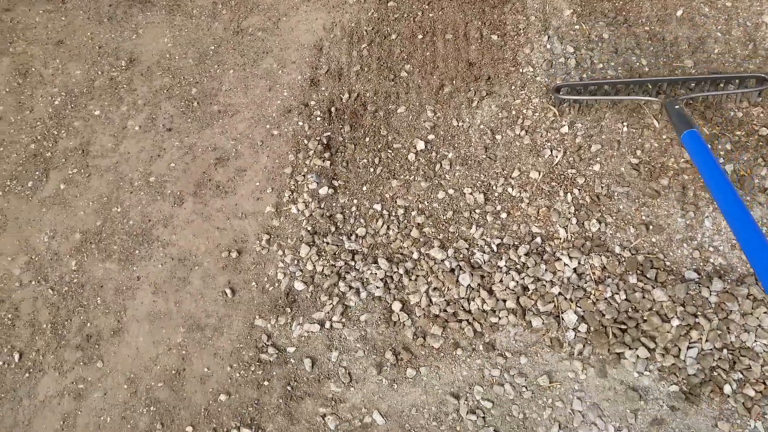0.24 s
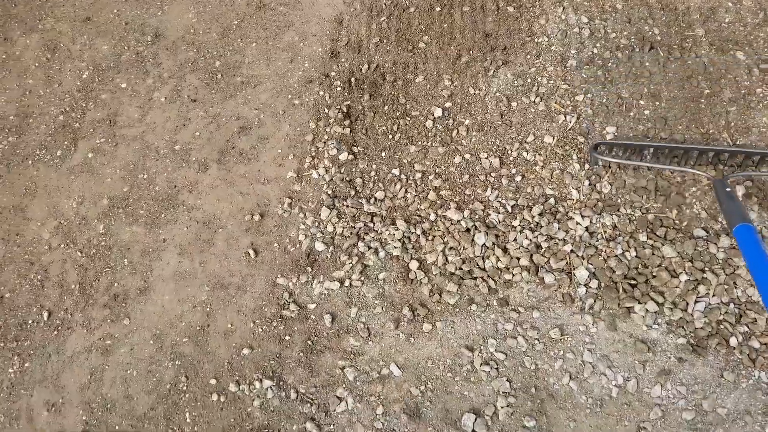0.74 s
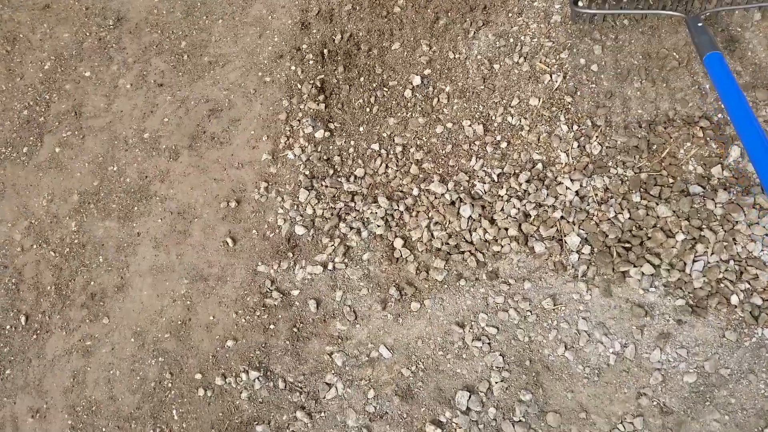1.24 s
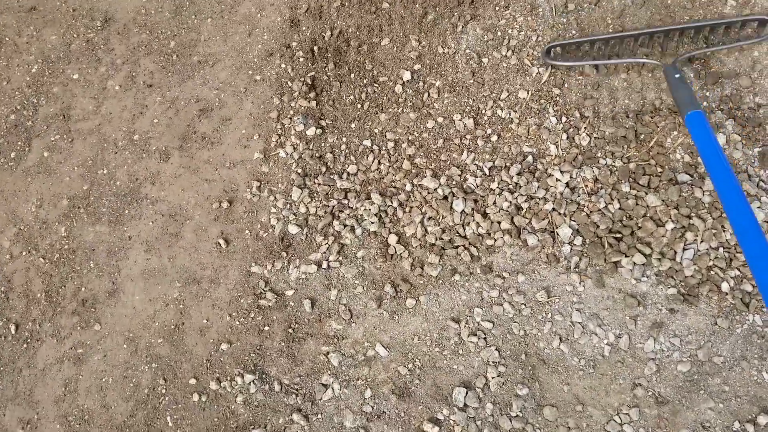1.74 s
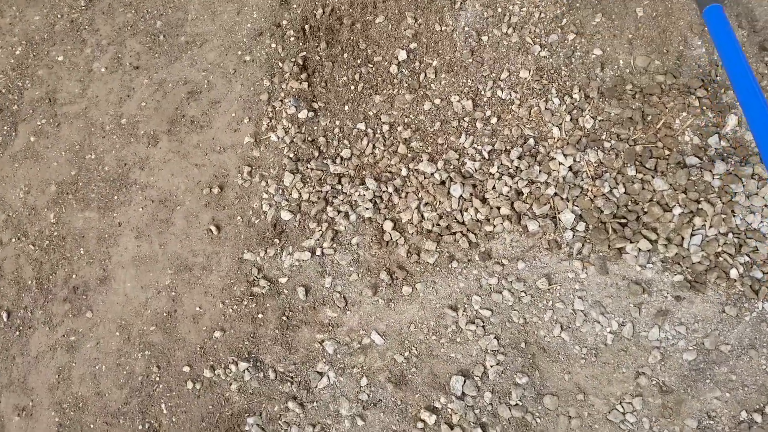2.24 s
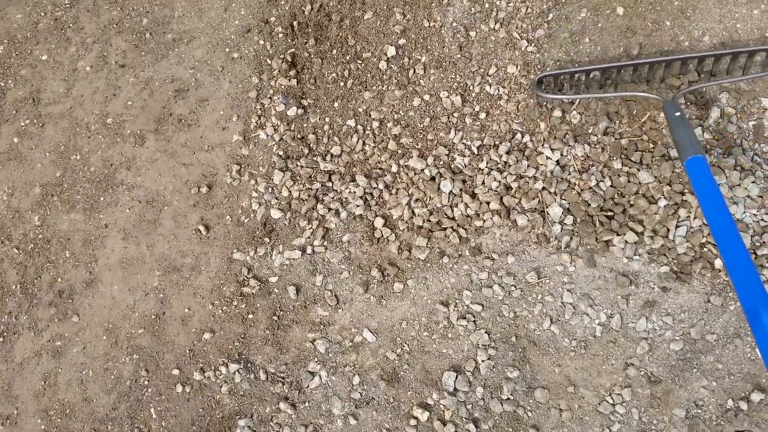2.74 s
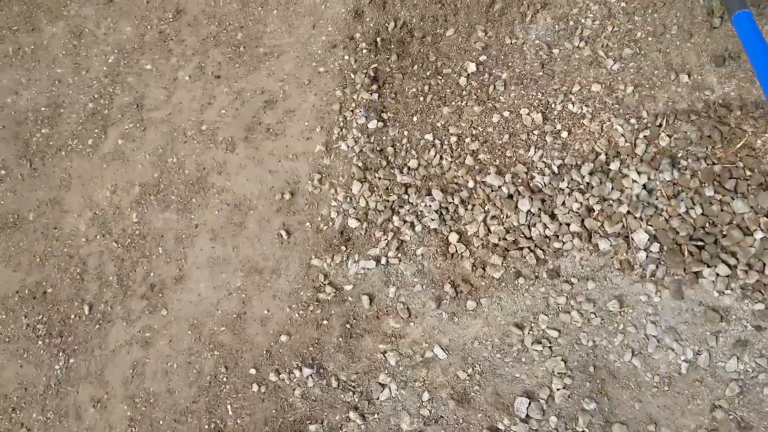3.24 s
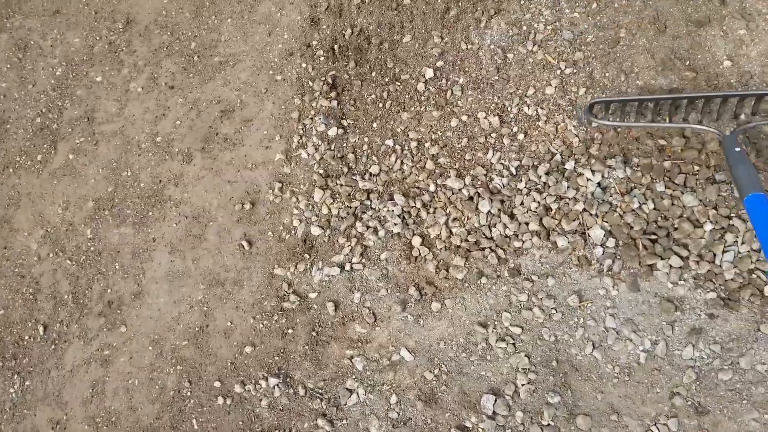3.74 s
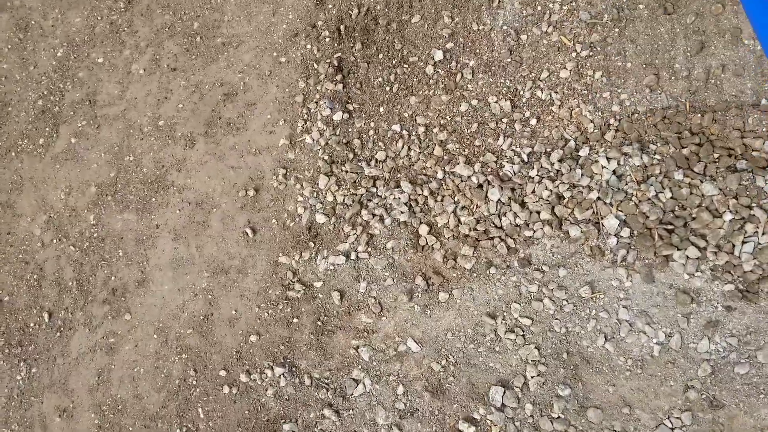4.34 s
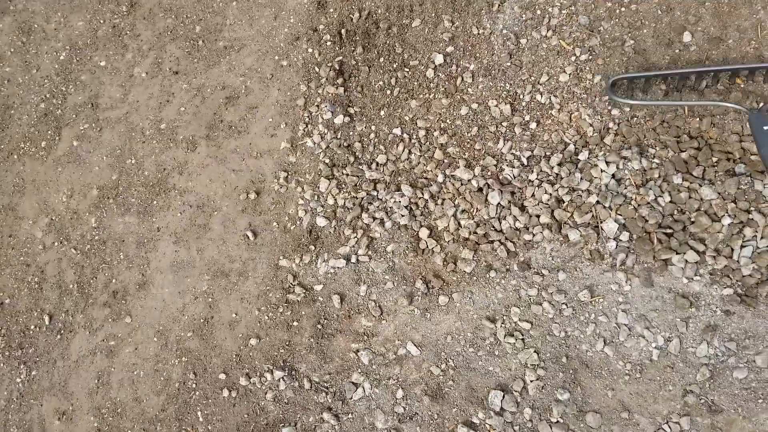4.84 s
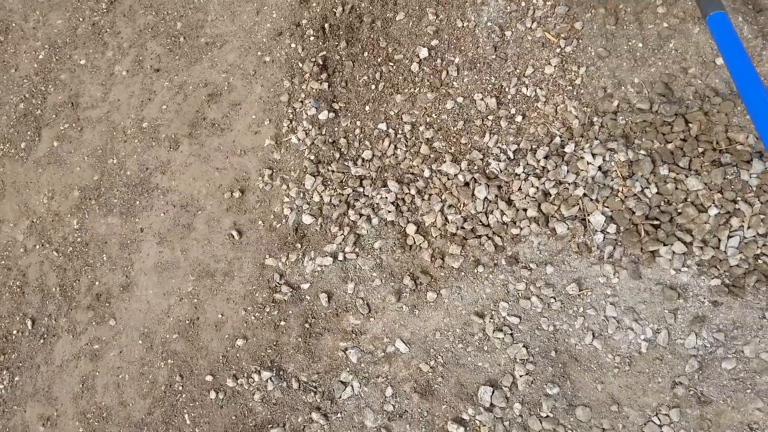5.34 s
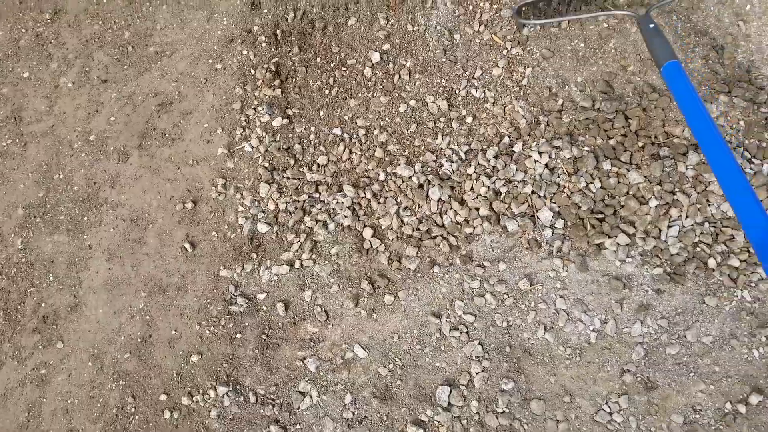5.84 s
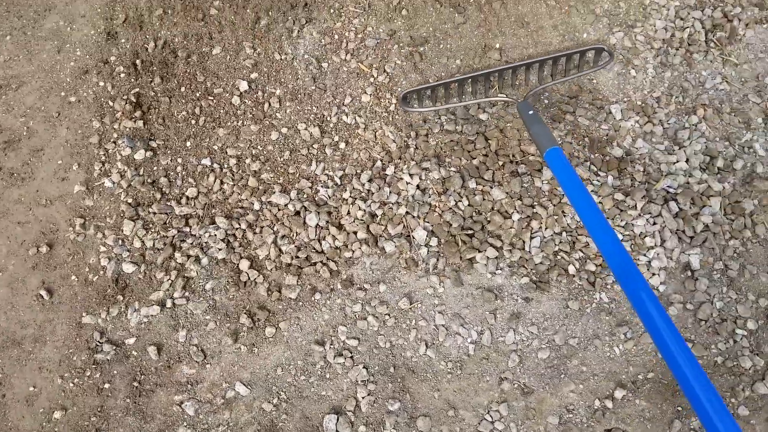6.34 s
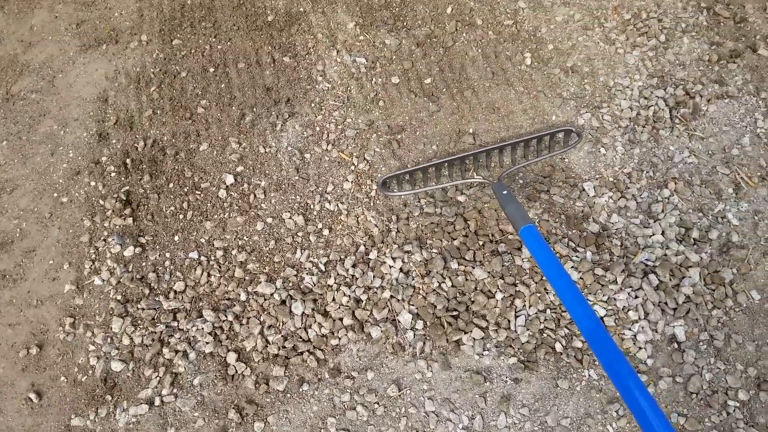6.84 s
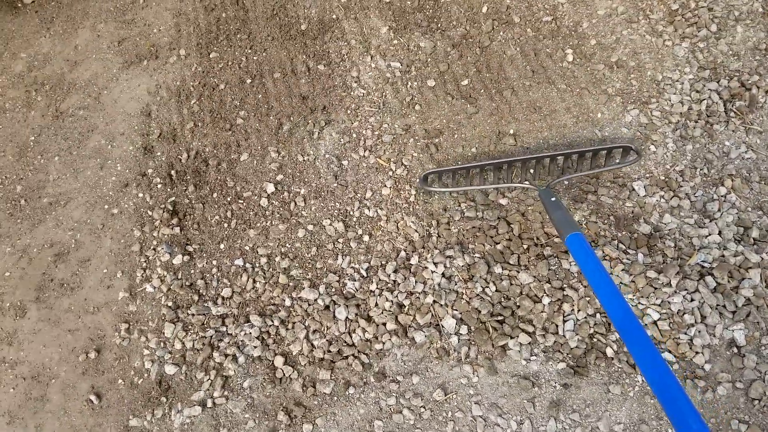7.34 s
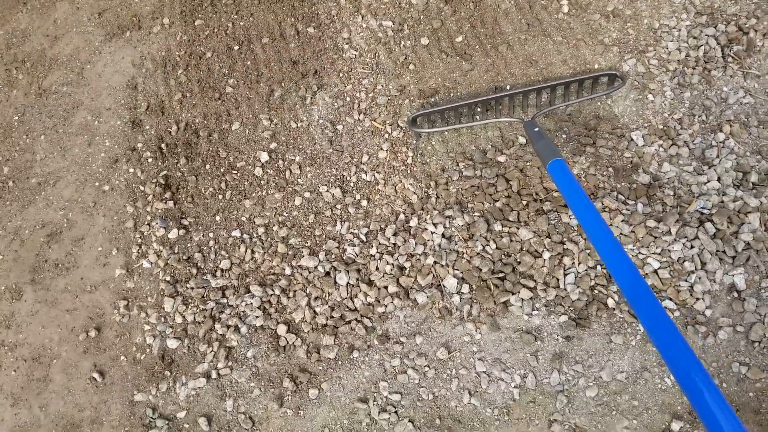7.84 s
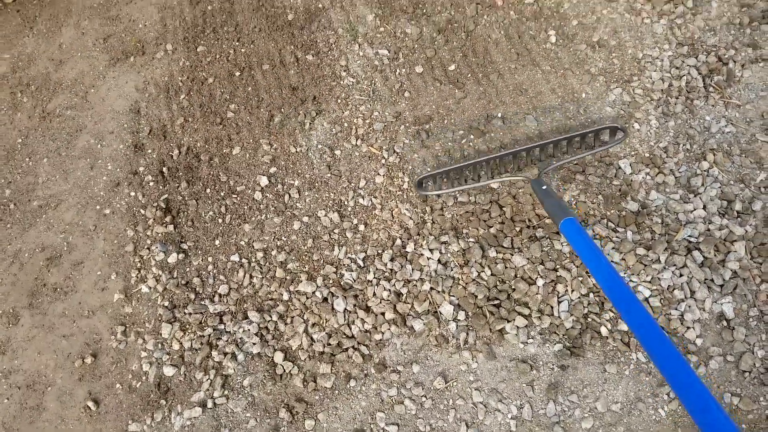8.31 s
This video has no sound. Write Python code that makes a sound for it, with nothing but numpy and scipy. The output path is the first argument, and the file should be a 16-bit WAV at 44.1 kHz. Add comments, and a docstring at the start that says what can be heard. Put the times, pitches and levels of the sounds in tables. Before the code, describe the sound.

Close outdoor raking: gritty scrapes, bright stone clacks against ringing metal tines, a dull handling bump, then quieter strokes with gaps.

```python
"""Raking gravel, close right

A metal rake is dragged back and forth through loose gravel on dirt, to the right of a hand-held camera.
Stones knock the tines and ring modes of the rake head, clack in bursts of noise and hiss as filtered sand.
The strokes thin out; a tine sometimes sings, and decaying low sines are rake thumps on dirt and one jolt tone.
Jolts swing the two microphones nearly against each other; far off lies a lumpy rumble under a thin hiss."""
import sys
import numpy as np
from scipy import signal
from scipy.fft import rfft, irfft, next_fast_len
from scipy.io import wavfile
from scipy.ndimage import uniform_filter1d, map_coordinates

SR = 44100
rng = np.random.default_rng(int(sys.argv[2]) if len(sys.argv) > 2 else 0)


def transcribe(u):
    """Save the signal u as a 16-bit wav file named by the first command-line argument.

    u: samples, shape (n,) or (channels, n), limited to [-1, 1]; the rate is SR.
    q: integer samples, one column per channel.
    """
    v = np.clip(np.atleast_2d(u).T, -1, 1)
    q = np.round(v * 32767).astype(np.int16)
    wavfile.write(sys.argv[1], SR, q)


N = 378245  # samples


def amp(db):
    """Decibels to gain."""
    return 10 ** (np.asarray(db) / 20)


def unit(x):
    """Scaled to rms 1."""
    return x / np.sqrt(np.mean(x ** 2) + 1e-20)


def along(points, hz):
    """Reads (Hz, value) points on a log frequency axis."""
    f, v = np.transpose(points)
    return np.interp(np.log(hz + 1), np.log(f + 1), v)


def curves(rows):
    """One value per sample for each column after the time."""
    s, *cols = np.transpose(rows)
    return [np.interp(np.arange(N) / SR, s, c) for c in cols]


def wobble(rate):
    """A smooth random curve through rate knots a second (below 200)."""
    knots = rng.standard_normal(int(N / SR * 200) + 4)
    return map_coordinates(knots, [np.arange(N) * rate / SR])


def filtered(x, response):
    """x times a complex response of frequency."""
    m = next_fast_len(N + SR // 2)
    return irfft(rfft(x, m) * response(np.fft.rfftfreq(m, 1 / SR)), m)[..., :N]


def mode(x, hz, width_hz):
    """x rings one resonance; an impulse of 1 rings at size 1."""
    r, w = np.exp(-np.pi * width_hz / SR), 2 * np.pi * hz / SR
    return signal.lfilter([0, np.sin(w)], [1, -2 * r * np.cos(w), r * r], x)


def contacts(rate, spread_db):
    """Random impulses, rate a second, mostly small with a few large ones; rms 1."""
    chance, size, sign = rng.random((3, N))
    heights = amp(-spread_db * np.log(size + .02))
    return unit((chance < rate / SR) * heights * np.sign(sign - .5))


def patchy(x, depth_db):
    """Random patches of colour in time and frequency, as stones of other sizes pass."""
    z = signal.stft(x, nperseg=256)[2]
    field = rng.standard_normal(z.shape[-2:])
    field = uniform_filter1d(uniform_filter1d(field, size=3, axis=0), size=6, axis=1)
    return signal.istft(z * amp(depth_db * unit(field)), nperseg=256)[1][..., :N]


# pulls of the rake: (full pressure from [s], until [s], scrape level there [dB], scrape level at the end [dB],
# rise [s], fall [s], tine rattle over the scrape [dB], grit over the scrape [dB])
STROKE_PULLS = [(0.102, 0.18, -35, -31.5, 0.1, .05, -4.5, -8),
                (0.207, 0.377, -31, -30.5, 0.053, 0.11, -0.5, -8),
                (0.413, 0.564, -30, -31.5, 0.047, .1, -3, -8.5),
                (0.795, 0.852, -33.5, -30.5, 0.1, .04, 1.5, -1.5),
                (0.894, 0.957, -37, -38.5, 0.028, .04, 1, -5), (1.007, 1.3, -28, -33.5, 0.033, .1, 2, -5),
                (1.461, 1.52, -34, -39, .07, .04, 1, -3.5), (1.61, 1.76, -21, -28, 0.079, .1, -3.5, -7),
                (1.888, 2.083, -23.5, -22, .05, 0.081, -4.5, -5),
                (2.15, 2.198, -36.5, -29, 0.13, 0.046, -2.5, -2.5),
                (2.345, 2.64, -27.5, -37, 0.075, .07, -1, -5),
                (2.727, 2.79, -30, -34, 0.055, .04, -4.5, -8.5),
                (2.82, 2.864, -25, -20.5, 0.055, 0.058, -1.5, -6.5),
                (2.92, 3.06, -29, -35, .03, .1, -2.5, -8), (3.319, 3.55, -28, -28.5, 0.091, .05, -2, -9),
                (3.687, 3.77, -34.5, -34, 0.077, 0.057, -1, -1),
                (3.815, 3.984, -27.5, -32.5, 0.037, .08, 1.5, -5),
                (4.116, 4.27, -29, -31.5, 0.041, .09, 1.5, -7),
                (4.444, 4.618, -34.5, -37, 0.11, 0.084, 3.5, -4.5),
                (4.64, 4.8, -29, -24.5, .04, 0.072, 0, -7),
                (5.029, 5.254, -27, -27.5, 0.14, 0.032, -0.5, -4),
                (5.27, 5.369, -34.5, -33, .04, 0.13, 1, -3),
                (5.62, 5.693, -32.5, -30.5, .05, 0.065, -4, -9.5),
                (5.73, 5.98, -29, -33.5, .04, .07, -5, -12),
                (6.1, 6.233, -31.5, -35.5, 0.06, 0.025, 0, -4.5),
                (7.13, 7.25, -51, -49.5, 0.13, .08, -4, 0.5),
                (7.344, 7.462, -34.5, -34, 0.048, 0.037, -1.5, -3),
                (7.516, 7.56, -41, -41.5, 0.029, .05, -10, -3.5),
                (7.694, 7.8, -59, -53.5, 0.065, .06, -4, 4.5), (8.062, 8.15, -50.5, -59, 0.14, .06, 2, 7),
                (8.24, 8.31, -25, -33, 0.047, .04, -9, -11.5),
                (8.364, 8.46, -21.5, -32.5, 0.023, .05, -0.5, -3),
                (8.552, 8.58, -44, -47, 0.062, .05, 9.5, -14)]
EDGE_DB = 20  # what a stroke gains in its rise time and loses in its fall time
REST_DB = -68.5  # sand trickling while the rake lies still
SURGE_DB, SURGE_RISE_S, SURGE_FALL_S = -22.5, 0.0031, 0.022  # gravel shoved along, relative to a loud stone


def strokes():
    """Gains of scrape, rattle and grit: each stroke rises, holds and falls; loud stones shove gravel along."""
    t = np.arange(N) / SR
    scrape = np.full(N, amp(REST_DB))
    rattle, grit = scrape.copy(), scrape.copy()
    for start, end, first_db, last_db, rise, fall, rattle_db, grit_db in STROKE_PULLS:
        outside = np.maximum(start - t, 0) / rise + np.maximum(t - end, 0) / fall
        press = amp(np.interp(t, [start, end], [first_db, last_db]) - EDGE_DB * outside)
        scrape = scrape + press
        rattle = rattle + press * amp(rattle_db)
        grit = grit + press * amp(grit_db)
    surge = np.zeros(N)
    for s, db, *_ in LOUD_STONES:
        surge += amp(db + SURGE_DB) * np.exp(np.minimum((t - s) / SURGE_RISE_S, (s - t) / SURGE_FALL_S))
    # rattle and grit are returned relative to the scrape
    return scrape + surge, rattle / scrape, grit / scrape


# loudest stones against the tines, also played by stones() and strokes():
# (time [s], level [dB], struck pitch [Hz], head knock [dB], tine ring [dB])
LOUD_STONES = [(0.0989, -21.5, 2520, -6, -2), (0.2181, -15.5, 2310, -1.5, -4),
               (0.2635, -11.5, 5300, -11, -14), (0.2964, -11.5, 2300, -3.5, -24),
               (0.4193, -23, 2030, 3, 0.5), (0.707, -24, 5200, -19, -20), (0.7588, -25, 4480, -24, -25),
               (0.7765, -12, 4060, -21, -26), (0.8926, -10, 4260, -14, -10.5),
               (0.9304, -7.5, 3250, -23, -34), (0.989, -22, 4100, -11, -2), (1.026, -12, 3300, -27, -9),
               (1.044, -19, 3380, -29, 5), (1.0615, -12, 3340, -24, -16), (1.1282, -10.5, 5230, -9, 3),
               (1.212, -9, 2160, -6.5, -10), (1.4986, -15, 6220, -2.5, -7),
               (1.5793, -11.5, 5300, -15, -12.5), (1.6253, -8, 5630, -3.5, -15),
               (1.6424, -7.5, 5230, -41, -4.5), (1.6778, -6.5, 5800, -7, -5.5),
               (1.7042, -16.5, 3870, -19, -6), (1.8977, -17.5, 4870, 4, 0), (1.949, -25, 4260, -25, -6),
               (2.0525, -13, 5580, -1.5, -19), (2.1728, -28, 4300, -14, 3), (2.3816, -15.5, 4320, -3, 0),
               (2.4383, -20, 4160, -2, -5), (2.4789, -7, 3180, -9, -23), (2.4876, -2.5, 3377, -27, -6),
               (2.5155, -15.5, 3300, -23, 0), (2.5436, -7, 3600, -15.5, -16),
               (2.5545, -13.5, 4240, -15, -4), (2.592, -8.5, 2510, -15, -17), (2.6204, -7, 5100, -33, -22),
               (2.815, -12.5, 4530, -9, -5), (2.9279, -10.5, 4300, -7, -13),
               (3.0139, -20.5, 6140, -14, -1.5), (3.2276, -25.5, 5140, -11, -14),
               (3.3513, -21, 4240, -22, 2), (3.435, -11, 2780, -21, -15), (3.4529, -6, 5040, -23.5, -38),
               (3.4675, -5, 3670, -15, -6), (3.5508, -14.5, 3620, -47, -13),
               (3.6847, -17.5, 2760, -3.5, -19), (3.7475, -18.5, 3180, -8, -11.5),
               (3.8602, -6.5, 3260, -9, -15.5), (3.928, -6.5, 2970, -31, -14), (4.0934, -15, 2260, -6, -16),
               (4.139, -5.5, 3248, -17, -6.5), (4.1873, -9.5, 5226, -34.5, -3.5),
               (4.2241, -18.5, 2900, -6, -2), (4.4255, -24.5, 5430, -9, 1.5),
               (4.4562, -19.5, 2330, -12, -6), (4.5393, -16, 2760, -9.5, -16), (4.6014, -17, 5820, -46, -5),
               (4.6418, -17, 3310, -4.5, -13), (4.6661, -17.5, 3160, -4, -2), (4.695, -2.5, 5000, -34, -19),
               (4.7556, -10, 2280, -10, -11), (4.7943, -4.5, 2140, -21, -22),
               (5.0417, -12, 5550, -19.5, -19), (5.083, -9.5, 3870, -19, -13), (5.1684, -14, 2730, -7, -6),
               (5.2628, -8.5, 4230, -8, -4.5), (5.3333, -18.5, 3280, -5, 5),
               (5.618, -16.5, 3310, -11.5, -26.5), (5.7356, -18, 2250, 0, -6),
               (5.7641, -15, 2190, -2.5, -4), (5.7804, -4.5, 3170, -31.5, -23), (5.8107, -18, 3800, -2, -6),
               (5.9345, -19.5, 4880, -10, -13), (6.0966, -23.5, 3210, -8.5, -7),
               (6.2188, -32.5, 3980, -14, -4.5), (6.5735, -37.5, 2100, -29, -22),
               (6.5944, -43.5, 2210, -19, -13), (6.6665, -46, 6160, -22, -12),
               (6.7426, -33.5, 6400, -31, -21), (7.012, -46.5, 6510, -24, -0.5),
               (7.129, -47, 5430, -22, -14), (7.177, -39, 1950, -10, -18), (7.3108, -38, 1960, -26, -16),
               (7.3392, -31, 4940, -22, 1), (7.3821, -12, 1940, -8, -18), (7.428, -15.5, 2050, -18, -17.5),
               (7.5186, -22.5, 2630, -29, -24), (7.636, -24.5, 6350, -32, -21),
               (7.7134, -31.5, 2160, -12, -17), (7.7707, -32, 4800, -10, -16),
               (7.8856, -26, 4870, -32, -22), (7.937, -32, 4210, -40, -10),
               (8.0523, -29.5, 4300, -14.5, -14), (8.2147, -24.5, 2190, -10, 0),
               (8.2495, -28.5, 2620, 5.5, 1), (8.3595, -16, 4940, -6.5, -10.5), (8.388, -16.5, 2880, -6, 3),
               (8.528, -23, 3200, -21, -23), (8.55, -15.5, 4530, -1, -2), (8.5604, -17, 3150, -4.5, 6)]
# resonances of the rake head and tines: (frequency [Hz], width [Hz], level [dB])
RAKE_MODES = [(506.6, 33, -8), (705, 20.6, -2.5), (767.4, 25, -1), (886, 8.8, -13.5), (1041, 38, 3),
              (1143, 4.5, -9), (1302.5, 25, 5), (1660, 37, 6), (2038, 97, 3), (2256, 61, 4.5),
              (2767, 56, 1), (3210, 40, -7.5), (3270, 66, -16), (3526, 50, -18.5), (4232, 57, -1),
              (4845, 22, -5.5), (5150, 9.4, -16), (5306, 69, -4), (5574, 23, -8), (6080, 27, -3),
              (6340, 32, -7.5), (8260, 250, -7)]


def rake(scrape, rattle):
    """Every contact rings the modes at new strengths, as each stone meets another tine."""
    bumps = contacts(400, spread_db=4) + 0.17 * rng.standard_normal(N)
    bumps *= amp(1.5 * wobble(25))
    s, peak_db, tine_hz, knock_db, ring_db = np.transpose(LOUD_STONES)
    at = np.round(s * SR).astype(int)
    modes_hz = np.transpose(RAKE_MODES)[0]
    struck_hz = modes_hz[np.argmin(np.abs(tine_hz[:, None] - modes_hz), axis=1)]
    head = np.zeros(N)
    for hz, width_hz, db in RAKE_MODES:
        high = np.clip(np.log2(hz / 1500) / .5, 0, 1)  # low modes belong to the head bar, high ones to the tines
        # which modes the passing stones reach drifts as the load moves along the head
        push = bumps * amp(4.9 * wobble(20))
        push *= amp(db - 12.5) / np.std(mode(push, hz, width_hz))
        push *= scrape * rattle ** high
        # a loud stone rings its own tine most
        tine_db = ring_db - 16 * (struck_hz != hz)
        spread, side = rng.standard_normal((2, len(s)))
        hit_db = peak_db + (1 - high) * (knock_db + db - 6) + high * tine_db + 2 * spread
        push[at] += np.sign(side) * amp(hit_db)
        head += mode(push, hz, width_hz)
    return head


def stones():
    """The loud stones clack: a brief ring of their own in a burst of crunch that takes a moment to build."""
    out, t = np.zeros(N + SR), np.arange(SR // 20) / SR
    for s, db, hz, *_ in LOUD_STONES:
        clack = .5 * np.sin(2 * np.pi * hz * t) * amp(-60 * t / 0.018)
        crunch = 0.29 * rng.standard_normal(len(t)) * amp(-60 * t / 0.042)
        crunch += 0.49 * rng.standard_normal(len(t)) * amp(-60 * t / 0.009)
        out[round(s * SR):][:len(t)] += amp(db) * (clack + crunch) * (1 - np.exp(-t / 0.00053))
    return patchy(out[:N], depth_db=4.5)


# colour of gravel and sand: (frequency [Hz], gain [dB])
SAND_COLOUR = [(60, -41), (150, 1.5), (300, -4), (600, -4), (1300, 5.5), (2500, -1.5), (5000, -2),
               (8000, -10.5), (11000, -9), (14000, -5.5), (16500, -7.5)]


def gravel(scrape, rattle, grit):
    """Pebbles tumble in clumps at the tines, each ticking at its own pitch; sand hisses along the whole head."""
    clumps = amp(3.26 * wobble(60) + 1.72 * wobble(18))
    t = np.arange(400) / SR
    pebbles = np.zeros(N)
    for hz in np.geomspace(700, 15000, 14):
        tick = np.sin(2 * np.pi * hz * t) * amp(-60 * t * hz / 12)  # 60 dB down after 12 cycles
        pebbles += signal.fftconvolve(contacts(120, spread_db=5), tick * np.sqrt(hz / 3000))[:N]
    near = unit(pebbles) + 0.61 * rng.standard_normal(N)
    # row 0 is near the tines, rows 1 and 2 are the wide sand at left and right
    flow = patchy(unit(clumps) * np.vstack([near, rng.standard_normal((2, N))]), depth_db=3)

    def below(hz, edge_hz):
        """A smooth low-pass gain."""
        return 1 / (1 + (hz / edge_hz) ** 4)

    def band(lo_hz, hi_hz):
        """The coloured flow between two edges."""
        return unit(filtered(flow, lambda hz: amp(along(SAND_COLOUR, hz)) * (below(hz, hi_hz) - below(hz, lo_hz))))

    low, mid, high = band(1, 1800), band(1800, 6500), band(6500, SR)
    stones_near = scrape * (amp(-10) * low[0] + amp(-12) * rattle * mid[0] + grit * high[0])
    # the wide sand reaches the two microphones unalike, most of all in the treble
    sand_wide = scrape * (amp(-14) * low[1:] + amp(-6.5) * rattle * mid[1:] + amp(-3) * grit * high[1:])
    return stones_near, sand_wide


# one tine rubs lightly and sings: (time [s], half-length to 1/e [s], frequency [Hz], level [dB])
TINE_RUBS = [(7.76, .06, 1310, -39), (7.74, .05, 1660, -46), (8.07, .1, 2275, -43), (3.33, .04, 1300, -34)]


def rubs():
    """Friction noise swells and fades in one mode."""
    t, out = np.arange(N) / SR, np.zeros(N)
    for s, length, hz, db in TINE_RUBS:
        swell = np.exp(-((t - s) / length) ** 2)
        out += amp(db) * swell * unit(mode(rng.standard_normal(N), hz, 70))
    return out


# low thumps of the rake on the dirt, and one low tone of the camera jolt at 2.94 s:
# (time [s], level [dB], frequency [Hz], decay by 60 dB [s])
LOW_THUMPS = [(1.616, -8.5, 184, 0.034), (1.674, -16, 167, 0.059), (2.369, -20.5, 176, 0.07),
              (2.938, -16.5, 165, 0.15), (3.435, -17, 171, 0.048), (4.136, -44, 191, 0.085),
              (4.754, -25.5, 163, 0.1), (6.515, -23, 293, 0.062), (7.29, -11, 272, 0.045),
              (8.296, -13.5, 183, 0.066), (8.311, -13.5, 304, 0.05)]


def thumps():
    """Rake thumps and one jolt tone: each a decaying low sine with a soft onset, no ring above the bass."""
    out, t = np.zeros(N + SR), np.arange(SR // 4) / SR
    for s, db, hz, t60 in LOW_THUMPS:
        knock = np.sin(2 * np.pi * hz * t) * (1 - np.exp(-t / 0.0056))
        out[round(s * SR):][:len(t)] += amp(db + 2.5 - 60 * t / t60) * knock
    return out[:N] * amp([[-1], [1]])


# mean lag of the left microphone behind the right; it ends nearer the middle: (time [s], lag [samples])
LEFT_LAG = [(0, 12.2), (5.9, 12), (6.5, 9), (8.58, 9.5)]


def placed(x):
    """The right microphone is nearer, by a lag that shifts along the head; rough ground scatters the treble."""
    t = np.arange(SR // 20) / SR
    # four scattering tails for each side take turns, 7 rounds a second
    turn = 2 * np.pi * np.arange(N) / SR * 7 + np.arange(4)[:, None] * np.pi / 2
    tails = rng.standard_normal((2, 4, len(t))) * amp(-60 * t / .025)
    tails /= np.linalg.norm(tails[0, 0])
    turned = x * np.maximum(np.sin(turn), 0)
    scatter = signal.fftconvolve(turned[None], tails, axes=2).sum(1)[:, :N]
    left = map_coordinates(x, [np.arange(N) - curves(LEFT_LAG)[0] - 1.6 * wobble(10)], order=5)
    direct = amp([[-1], [1]]) * np.array([left, x])
    return direct + amp(-1) * filtered(scatter, lambda hz: hz / (hz + 2000))


# the camera is jolted: (time [s], level [dB], swing frequency [Hz])
CAMERA_JOLTS = [(2.922, -3.5, 262), (2.932, -5.5, 162), (2.944, 0, 170), (2.962, -5.5, 110.5),
                (2.976, -12.5, 377), (2.993, -16.5, 80), (3, -21, 500), (3.028, -11, 140),
                (3.05, -17.5, 90.5), (5.688, -22, 71)]
JOLT_CYCLES = 0.54  # swings until the rocking is widest
JOLT_RATTLE_DB, JOLT_RATTLE_HZ = -14.5, 590  # the housing's dull rattle


def jolts():
    """The body rocks and rattles, so the two microphones swing nearly against each other."""
    out, t = np.zeros((2, N + SR)), np.arange(SR // 5) / SR
    noise = rng.standard_normal((2, N))
    rattle = unit(filtered(noise, lambda hz: 1 / (1 + (hz / JOLT_RATTLE_HZ) ** 2)))
    late = np.maximum(t - np.array([[.0006], [0]]), 0)  # the left starts a little later
    for s, db, hz in CAMERA_JOLTS:
        at = round(s * SR)
        swing = np.sin(2 * np.pi * hz * late) * [[1], [-1]]
        swing = swing + amp(JOLT_RATTLE_DB) * rattle[:, at:at + len(t)]
        u = late * hz / JOLT_CYCLES
        out[:, at:at + len(t)] += amp(db) * u * np.exp(1 - u) * swing
    return out[:, :N]


# level of the far rumble as it is heard at the camera; it dips briefly after the big jolt:
# (time [s], level [dB])
FAR_LEVEL = [(0, -31.5), (.15, -34.5), (.45, -32.5), (.7, -35), (1.12, -29), (1.3, -34.5), (1.65, -29.5),
             (1.78, -33), (2.05, -30.5), (2.14, -35.5), (2.41, -28), (2.68, -41), (2.96, -26), (3.14, -47),
             (3.35, -31), (3.65, -41.5), (4.15, -32), (4.27, -39.5), (5.15, -35.5), (5.9, -36), (6.6, -31),
             (7.17, -29), (7.9, -31.5), (8.2, -31.5), (8.41, -31.5), (8.58, -38)]
# colour of the far rumble: (frequency [Hz], gain [dB])
RUMBLE_COLOUR = [(12, -49), (20, -27), (64, 0), (81, 1), (108, -7.5), (154, -10.5), (183, -12.5),
                 (300, -25), (363, -31), (900, -51), (1170, -89), (1980, -120)]
# colour of the thin hiss: (frequency [Hz], gain [dB])
AIR_COLOUR = [(290, -8), (500, -5), (906, -19), (2540, -16), (3200, -33.5), (7210, -31.5), (8700, -36.5),
              (11500, -18), (14500, -18.5), (16000, -29)]
AIR_DB = -54  # rms level of the hiss


def background():
    """A lumpy far rumble of filtered noise, mostly shared by both microphones, over a thin hiss."""
    shared, left, right = rng.standard_normal((3, N))
    lumps = amp(1.8 * wobble(12))
    both = np.array([shared + 0.34 * left, shared + 0.32 * right]) * lumps
    rumble = filtered(both, lambda hz: amp(along(RUMBLE_COLOUR, hz)))
    air = filtered(rng.standard_normal((2, N)), lambda hz: amp(along(AIR_COLOUR, hz)))
    return amp(curves(FAR_LEVEL)[0]) * unit(rumble) + amp(AIR_DB) * unit(air)


def scene():
    """Rake and gravel at one spot to the right, sand spread wide, jolts at the camera, a far background."""
    scrape, rattle, grit = strokes()
    pebbles, sand = gravel(scrape, rattle, grit)
    at_rake = rake(scrape, rattle) + rubs() + stones() + pebbles
    return placed(at_rake) + sand + thumps() + jolts() + background()


BASS_HZ, TOP_HZ = 29.7, 15900  # the microphones roll off below; band limit above


def record(dry):
    """The deepest bass rolls off, peaks round off at full scale; nothing is kept above the band limit."""
    dry = filtered(dry, lambda hz: 1j * hz / (BASS_HZ + 1j * hz))
    rounded = dry / (1 + np.abs(dry) ** 8) ** (1 / 8)
    return filtered(rounded, lambda hz: hz < TOP_HZ)


dry = scene()
out = record(dry)
transcribe(out)
```